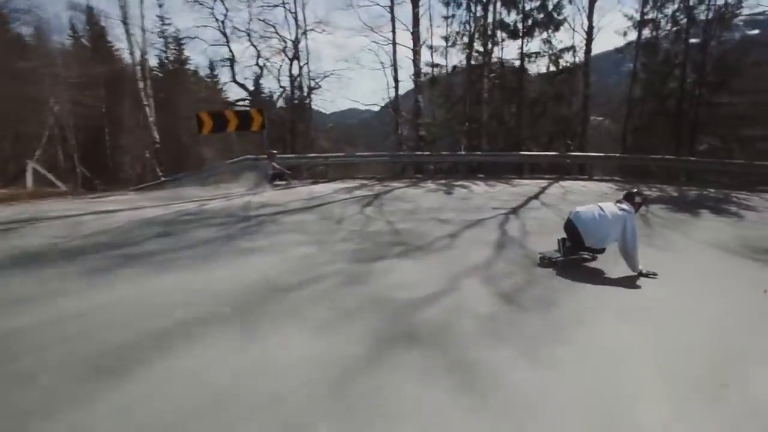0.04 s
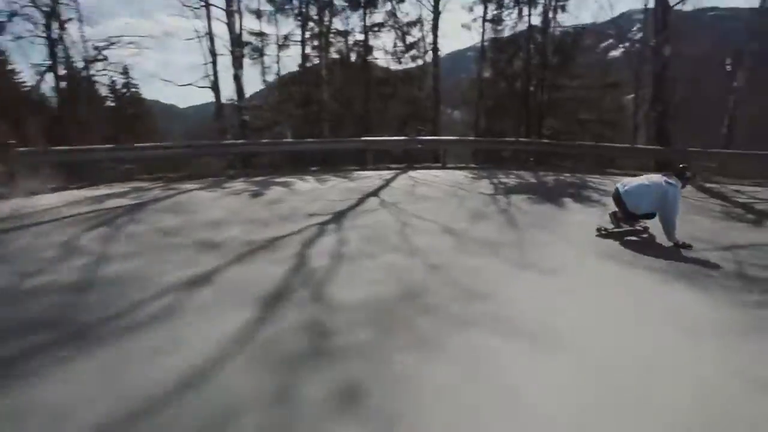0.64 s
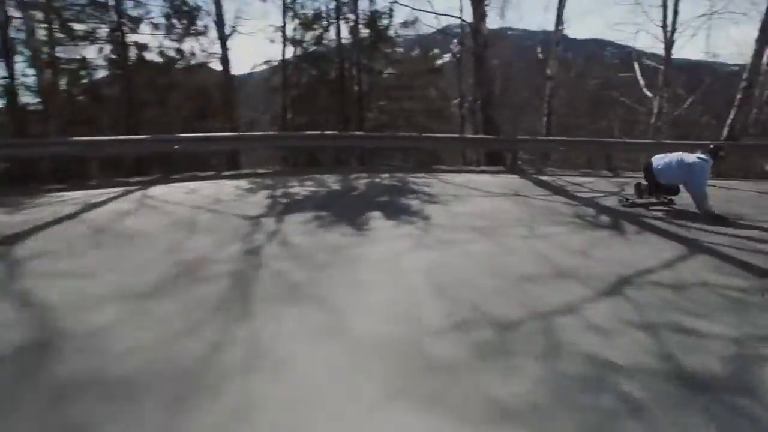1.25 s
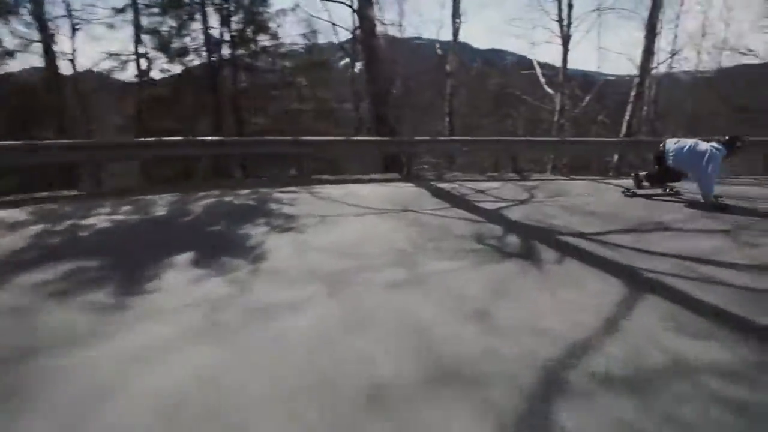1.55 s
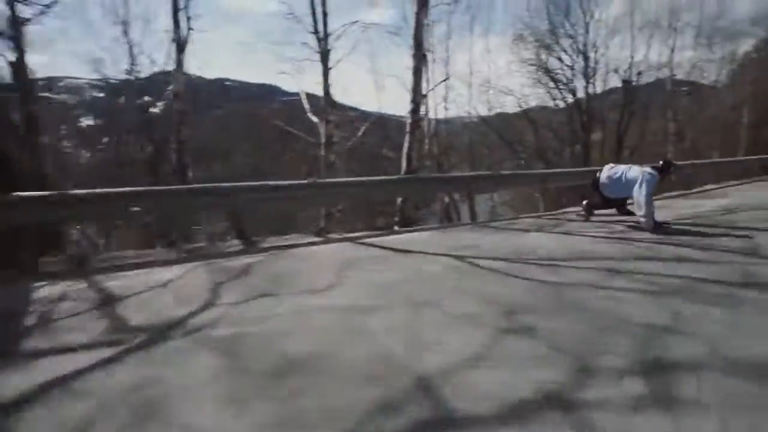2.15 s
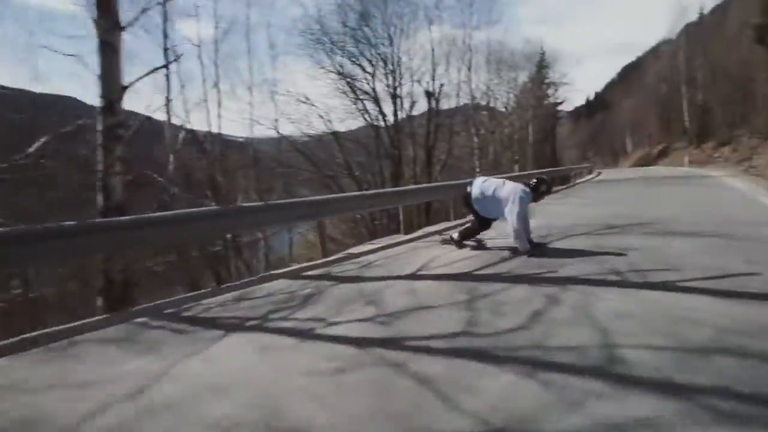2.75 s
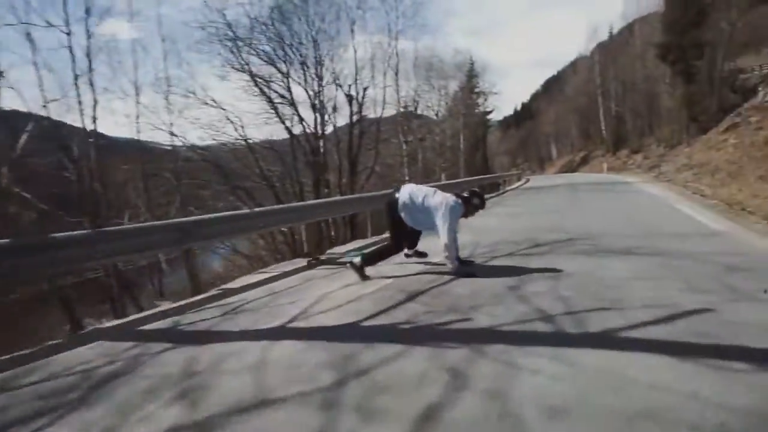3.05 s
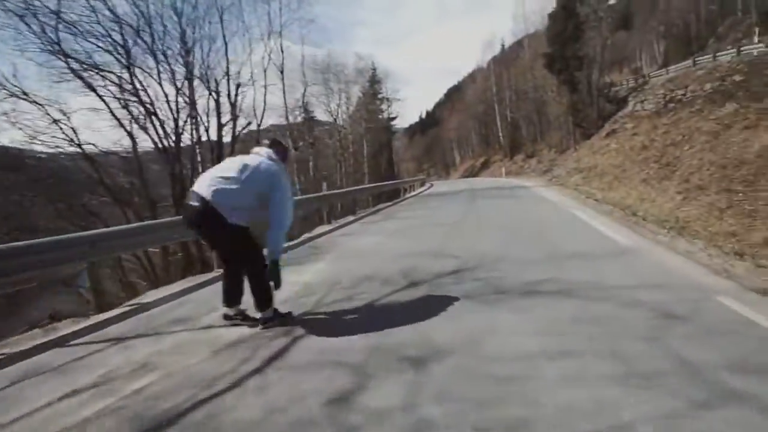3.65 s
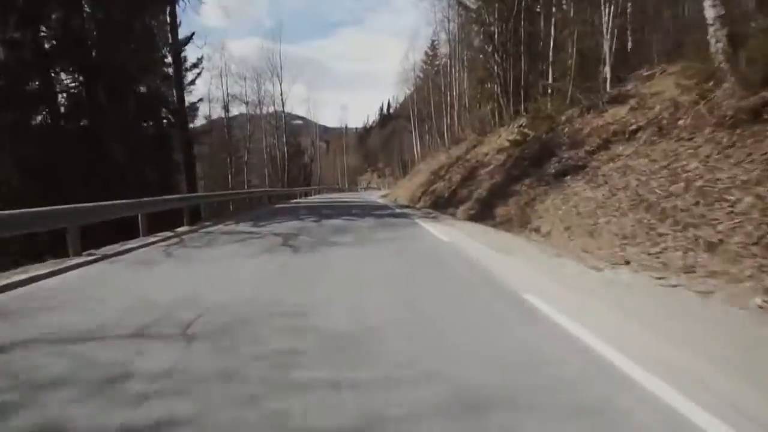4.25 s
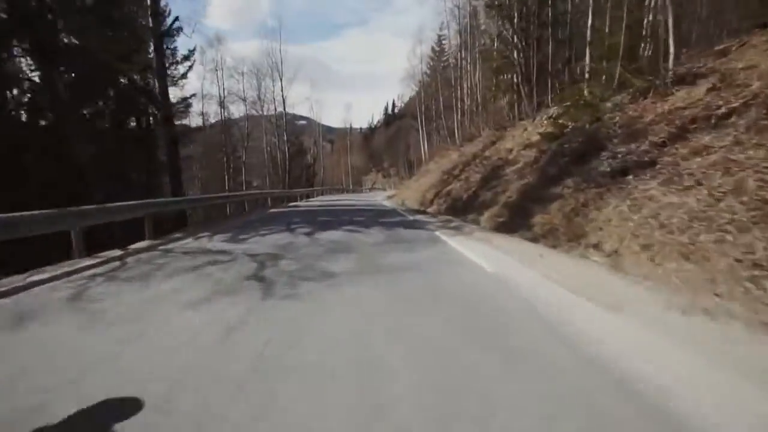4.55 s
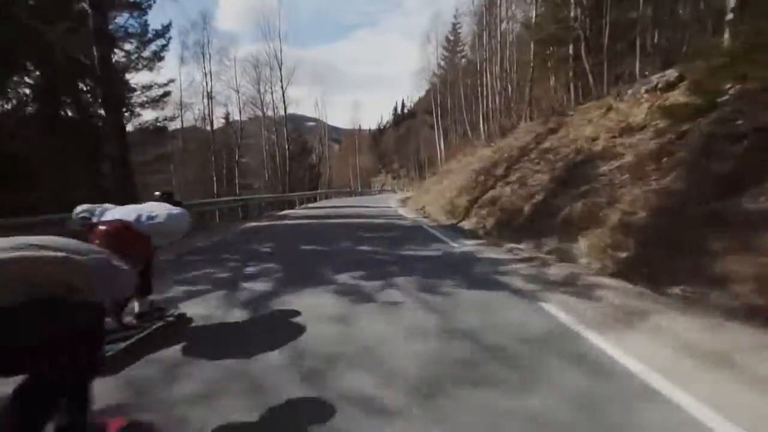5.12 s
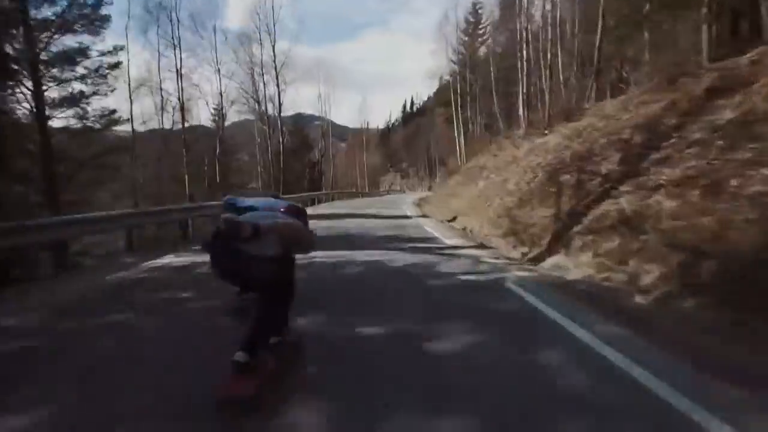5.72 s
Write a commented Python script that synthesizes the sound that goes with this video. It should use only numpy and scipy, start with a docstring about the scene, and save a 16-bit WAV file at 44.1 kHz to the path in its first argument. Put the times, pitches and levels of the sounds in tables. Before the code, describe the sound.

From the start, longboard wheels roll on asphalt with a quiet rumble and a fuzzy hum, while light, irregular gusts ruffle and thud on the microphone, mostly on the right. A faint gritty scrape and hiss of sliding wheels and a glove runs alongside, with small cracks of grit and short high chirps, strongest from about 1.3 to 2.8 seconds. Between roughly 0.7 and 2.5 seconds, the air on the right adds a soft, hollow rush. Around 3 seconds the scraping fades and the wheels settle into a faint whine, followed by a quick run of tiny metallic ticks at 3.6 to 3.8 seconds. At about 3.9 seconds, a click starts an abrupt, far louder wind roar on both sides. It covers the wheels, buffeting unevenly with a fizzy edge and growing slightly until the end, near 6 seconds.

```python
"""A mountain hairpin, heard from a car that follows longboarders. Rolling wheels hum, and sliding friction
makes a glove puck and the wheels scrape and chirp over gritty asphalt. Turbulent pressure from light
gusts ruffles mainly the right microphone port, and the cabin air resonates at an open window. As the
rider stands up, a chipped wheel ticks briefly; then, at an abrupt cut, a click and a loud wind roar
start in both ports."""
import sys
import numpy as np
from scipy import signal
from scipy.fft import rfft, irfft
from scipy.io import wavfile
from scipy.ndimage import uniform_filter1d, minimum_filter1d

SR = 44100
rng = np.random.default_rng(int(sys.argv[2]) if len(sys.argv) > 2 else 0)


def to_wav(s):
    """Save 16-bit WAV."""
    ch = np.atleast_2d(s).T  # columns
    pcm = np.round(np.clip(ch, -1, 1) * 32767)  # PCM
    wavfile.write(sys.argv[1], SR, pcm.astype(np.int16))


N = 254898
TIME = np.arange(N) / SR
BINS = np.fft.rfftfreq(N, 1 / SR)

# spectra of the wind noises: (frequency [Hz], relative spectral density [dB])
ROAR_SPECTRUM = [(24, -39), (42, -18.5), (90, -4.5), (200, -2), (400, 0), (620, 0), (950, -1.5), (1400, -9),
                 (2000, -24), (3000, -29.5), (6000, -64)]
FIZZ_SPECTRUM = [(700, -21), (1600, 10), (2600, -3), (4000, -7), (6000, -15.5), (9000, -24.5),
                 (12000, -31.5), (15500, -39)]
RUFFLE_SPECTRUM = [(25, -41), (70, -5.5), (130, -14), (300, 6.5), (500, 1.5), (800, -7), (1300, -18),
                   (2500, -33), (6000, -61)]
THUD_SPECTRUM = [(30, -35), (70, -1.5), (130, 1), (230, 5), (400, -6), (900, -44), (3000, -70)]
EDDY_SPECTRUM = [(25, -38), (55, -34), (110, -3), (170, -4), (240, 1.5), (400, -5), (650, -15), (1100, -38),
                 (2000, -55), (5000, -62)]
FAST_AIR_SPECTRUM = [(100, -49), (300, -1.5), (480, 1.5), (660, -2), (820, -3), (1050, -16), (1600, -24),
                     (4000, -46.5)]
# unequal response of the two ports to the airstream: (frequency [Hz], left minus right [dB])
PORT_BALANCE = [(30, 19), (60, 5), (120, -3.5), (220, -1.5), (500, 2), (740, 6), (1130, 10), (1700, 6.5),
                (2600, 3.5), (8000, 4), (15000, 6.5)]
# buffets of the whole airstream: (centre time [s], duration [s], left gain [dB], right gain [dB])
STREAM_BUFFETS = [(4.082, 0.058, -1.5, -5.5), (4.21, 0.023, 1.5, -5.5), (4.325, 0.062, 1, 2.5),
                  (4.43, 0.069, 3, 2), (4.578, 0.085, -2, 0), (4.68, 0.088, 1, 2.5),
                  (4.955, 0.077, -2.5, -4.5), (5.04, 0.064, -2, -4.5), (5.11, 0.074, 1, -1.5),
                  (5.19, 0.13, -.5, -2), (5.255, 0.02, 4, -3.5), (5.37, 0.057, 1, -2.5),
                  (5.565, 0.056, 0.5, 2.5)]
# surges in the roar's low band: (centre time [s], duration [s], left gain [dB], right gain [dB])
ROAR_SURGES = [(3.925, 0.051, 6.5, 2), (4.325, 0.11, 2, 1.5), (4.5, 0.04, 6, 0), (5.52, .035, 2, 0.5),
               (5.67, .07, 1.5, -1.5)]
# flares of fizz above the roar: (centre time [s], duration [s], left gain [dB], right gain [dB])
FIZZ_FLARES = [(4.053, 0.026, 8, -2), (4.16, 0.072, 3, -2), (4.685, 0.24, 2.5, 1), (4.95, 0.19, 3, 2),
               (5.1, 0.037, -0.5, 4), (5.42, 0.11, 2, -1)]
# single gusts: (time [s], relative level [dB], left minus right [dB], duration [s], thud share [0-1])
PORT_GUSTS = [(0.038, -47.5, 17, 0.031, 1), (0.328, -41.5, -14, 0.0049, 0.91),
              (0.364, -39, -29, 0.028, 0.027), (0.413, -48.5, -23, 0.033, 0),
              (0.513, -41, -30, 0.032, 0.57), (0.616, -42.5, -16, .016, 0.45),
              (0.67, -42.5, -10, 0.034, 0.66), (0.711, -41.5, -15, 0.016, 0.15),
              (0.74, -38, -7, 0.033, .45), (0.778, -44, 16.5, 0.019, 0.48), (1.034, -45, -24, 0.022, 0.55),
              (1.09, -37.5, -32, 0.017, 0.36), (1.467, -42, -20, 0.014, 0.16),
              (1.541, -39, -19, 0.024, 0.12), (1.586, -41.5, -24, 0.022, 0.36),
              (1.656, -41, -24, 0.012, 0.063), (1.767, -37, -24, 0.018, 0), (2.041, -42, -20, 0.012, 0.016),
              (2.141, -51.5, -18, 0.0076, .4), (2.422, -39.5, -16, 0.015, 0.029),
              (2.526, -41, -19, 0.026, 0.4), (2.607, -38, -19, 0.01, 0.74),
              (2.665, -43.5, -22, 0.016, 0.14), (2.841, -51, -22, 0.027, 0.25),
              (3.026, -43.5, -24, 0.023, 1), (3.127, -39.5, -32, 0.014, 0.76),
              (3.217, -42, -25, 0.016, 0.96), (3.336, -39.5, -26, 0.006, 0.91)]
# lulls as the side air lets go of the port: (centre time [s], duration [s], gain [dB])
BREEZE_LULLS = [(0.588, 0.035, -12), (0.858, 0.053, -9.5), (1.432, 0.042, -7.5), (1.729, 0.073, -14),
                (2.738, 0.17, -4.5), (2.973, 0.067, -4.5)]
# hollow note blown across the right port: (time [s], centre frequency [Hz])
HOLLOW_PITCH = [(1.0, 660), (1.12, 557), (1.27, 611), (1.38, 510), (1.55, 630), (2.05, 561.4), (2.22, 627),
                (2.45, 471)]

# spectra of rolling and sliding contact: (frequency [Hz], relative spectral density [dB])
RUMBLE_SPECTRUM = [(25, -9.5), (60, -3.5), (120, 0), (220, -2), (380, 2), (650, -1.5), (950, -6),
                   (1350, -9), (1800, -17), (2800, -21.5), (4000, -25), (8000, -30.5), (15000, -35)]
SCRAPE_SPECTRUM = [(500, -27), (1200, -3), (1900, 1), (2400, 1), (3000, -1), (3700, -5), (4700, -10.5),
                   (7000, -20)]
HISS_SPECTRUM = [(2500, -5), (4700, -2), (5900, 1.5), (6900, -6.5), (8000, 0.5), (8900, 3.5), (10200, -3),
                 (12500, -4.5), (15500, -10.5)]
# pitch of the wheels' hum, proportional to road speed: (time [s], frequency [Hz])
HUM_PITCH = [(0, 444), (.95, 455), (1.6, 468), (1.85, 505), (2.15, 515), (2.4, 495), (2.95, 490),
             (3.2, 466), (3.5, 457), (3.65, 446), (3.87, 443)]
# urethane under side load: (time [s], duration [s], centre frequency [Hz], fall [Hz], level [dB])
WHEEL_MOANS = [(.15, .13, 970, 140, -68.5), (3.48, .2, 763, 18, -70), (3.52, .18, 432, 30, -63),
               (3.69, .26, 326, 30, -60.5)]
# sliding: (time [s], relative scrape level [dB], relative hiss level [dB], scrape left minus right [dB])
SLIDE_LEVELS = [(0.02, -74, -67.5, 2), (0.09, -74.5, -71, 0), (0.89, -79, -80.5, -11), (1.22, -77, -77, -7),
                (1.33, -69.5, -76.5, -5), (1.75, -67, -72, -5), (1.8, -65, -74.5, -5),
                (2.38, -70.5, -75, -2), (2.46, -71, -69, -1), (2.66, -72, -73.5, 1)]
# rasps as the glove drags and lifts: (time [s], relative level [dB], duration [s])
GLOVE_RASPS = [(1.152, -64, .014), (1.83, -57.5, 0.018), (1.989, -56, 0.013), (2.106, -65, 0.0098),
               (2.445, -59, 0.013), (2.52, -65, .025), (2.726, -58, 0.018), (3.1, -68, 0.014),
               (3.198, -60.5, 0.026), (3.377, -68, 0.045), (3.462, -69.5, 0.032)]
# urethane gripping: (time [s], duration [s], start frequency [Hz], end frequency [Hz], level [dB])
SKID_CHIRPS = [(0.0, 0.049, 2600, 2730, -69), (0.14, 0.066, 2560, 2730, -71),
               (1.095, 0.027, 2850, 2870, -67), (1.984, 0.036, 2310, 2670, -64),
               (2.426, 0.057, 2520, 2890, -69), (2.731, 0.032, 2640, 2910, -63),
               (2.933, 0.028, 1850, 2000, -66), (2.986, 0.048, 2500, 3100, -67)]
# grit cracking under the slide: (time [s], relative level [dB], crunch gain [dB])
GRIT_CRACKS = [(0.0345, -62, -8), (.1765, -62, -1), (0.841, -63, -2), (1.026, -60, -4), (1.1775, -62, -1),
               (1.517, -60, 2), (1.6926, -62, -5), (1.9779, -70, 2), (1.992, -69, 11), (2.743, -73, 15),
               (2.995, -75, 13), (3.2147, -65, 8), (3.3937, -70, -1)]
# a chip in a wheel striking once a turn: (time [s], relative level [dB], main mode gain [dB])
CHIP_STRIKES = [(3.584, -71, -1), (3.638, -63.5, -1), (3.688, -64.5, 10), (3.7373, -61, -3),
                (3.7885, -67, 8), (3.8357, -72, 5)]
# lesser modes of wheel and truck: (frequency [Hz], relative level [dB], 60 dB decay time [s])
TRUCK_MODES = [(2630, -5, .028), (3250, -11, .02), (6450, -10, .012), (7900, -8, .014), (8450, -3, .006)]
# swells of the resonating cabin air: (time [s], duration [s], level [dB])
WINDOW_THROBS = [(.6, 0.5, -69), (1.545, 1.32, -66), (2.645, 1.2, -70)]

CRUISE_HZ = 480  # pitch of the hum at cruising speed


def airstream(cut_s=3.8743, growth_db_per_s=1.49, fizz_growth_db_per_s=2.5, body_hz=700):
    """Turbulent pressure grows with flow speed: roar and fizz, starting with a click at an abrupt cut."""
    age = np.maximum(TIME - cut_s, 0)
    ports = pan(read(PORT_BALANCE))
    eddies = wander(78)  # shared by roar and fizz
    roar = unit(turbulence(ROAR_SPECTRUM, eddy_hz=323, lumpy_db=2.6, sides=ports) * amp(1.46 * eddies))
    body = lowpass(roar, body_hz, slope=6)
    roar += (amp(at_ports(ROAR_SURGES)) - 1) * body
    fizz = unit(turbulence(FIZZ_SPECTRUM, eddy_hz=620, lumpy_db=2.5, sides=ports) * amp(1.55 * eddies))
    buffet_db = at_ports(STREAM_BUFFETS)
    lag_db = -2.5 * np.exp(-age / 0.3)  # the fizz takes a moment to build
    flare_db = at_ports(FIZZ_FLARES) + 0.22 * buffet_db + lag_db
    fizz *= amp(-18 + fizz_growth_db_per_s * age + flare_db)
    force = amp(-26 + growth_db_per_s * age + buffet_db) * pan(-0.25)
    wind = force * (amp(2.5) * roar + fizz)
    cut_ramp = np.interp(age, [0, 0.04], [0.75, 1])
    cut_click = -amp(-21.5) * np.exp(-age / 0.0007) * pan(18)
    return (TIME > cut_s) * (cut_ramp * wind + cut_click)


def gusts():
    """Passing vortices ruffle or thud on a port; the low pressure in each core gives a sharp suction."""
    ruffle, thud, core = np.zeros((3, 2, N))
    for s, db, side_db, length, thud_share in PORT_GUSTS:
        strength = amp(db) * pan(side_db)
        puff = strength * swell(s, length)
        ruffle += np.sqrt(1 - thud_share) * puff
        thud += np.sqrt(thud_share) * puff
        core += strength * bump(s + length / 4, length=0.0014)
    suction = -amp(-3) * irfft(rfft(core) * amp(read(RUFFLE_SPECTRUM)), N)
    ruffles = amp(-6) * ruffle * turbulence(RUFFLE_SPECTRUM, eddy_hz=160, lumpy_db=0.5)
    thuds = amp(-8) * thud * turbulence(THUD_SPECTRUM, eddy_hz=60, lumpy_db=-1.5)
    return ruffles + thuds + suction


def breeze(flutter_db=1.8):
    """Grazing flow brushes the right port with eddies; at the apex faster air blows a hollow note."""
    in_bend = hold(start=0.25, attack=0.14, end=3.14, release=0.45)
    at_apex = hold(start=0.63, attack=0.18, end=2.33, release=0.29)
    swept = hold(start=0.83, attack=0.12, end=2.26, release=0.16)
    eddy_gain = in_bend * amp(-53.5 - 7 * swept)  # the fast air sweeps the slow eddies away
    eddies = eddy_gain * turbulence(EDDY_SPECTRUM, eddy_hz=75.4, lumpy_db=4) * pan(-38)
    rush = amp(-56) * turbulence(FAST_AIR_SPECTRUM, eddy_hz=90, lumpy_db=1)
    hollow = amp(-59.5) * narrowband(follow(HOLLOW_PITCH)[0], width_hz=148)
    stream = at_apex * amp(flutter_db * wander(23)) * (rush + hollow) * pan(-19)
    lull_db = sum(db * bump(s, length) for s, length, db in BREEZE_LULLS)
    return (eddies + stream) * amp(lull_db)


def wheels(rumble_db_per_octave=6.5, hum_db_per_octave=45):
    """Rolling noise: rumble and hum grow with speed; as grip returns, the rumble dulls under a whine."""
    hz, = follow(HUM_PITCH)
    octaves = np.log2(hz / CRUISE_HZ)
    settled = np.interp(TIME, [2.9, 3.7], [0, 1])  # the board runs smoother out of the bend
    road_gain = amp(-60.5 + rumble_db_per_octave * octaves)
    road = road_gain * turbulence(RUMBLE_SPECTRUM, eddy_hz=39.4, lumpy_db=3)
    dull = lowpass(road, 1500, slope=8)
    rumble = (amp(-3.5 * settled) * dull + amp(-9 * settled) * (road - dull)) * pan(-0.52)
    hum = amp(-68.5 + hum_db_per_octave * octaves) * narrowband(hz, width_hz=17.5)
    drift = hold(start=1.2, attack=0.87, end=2.33, release=0.28)
    side_shudder = drift * amp(-61) * narrowband(hz, width_hz=57) * pan(1.5)
    grip = hold(start=2.7, attack=0.4, end=3.58, release=0.3)
    clear_tone = whine(hz, waver_hz=5) + amp(-4.5) * whine(2 * hz, waver_hz=5)
    return rumble + hum + side_shudder + amp(-65.5) * grip * clear_tone


def moans():
    """Urethane vibrates under side load in short falling tones."""
    out = np.zeros((2, N))
    for s, length, centre_hz, fall_hz, db in WHEEL_MOANS:
        progress, level = arch(s, length)
        out += amp(db) * level * whine(centre_hz + fall_hz * (0.5 - progress), waver_hz=5.2)
    return out


def slide(regrip_s=2.71, scrape_db_per_s=-16, hiss_db_per_s=-47):
    """Sliding friction breaks asperities under puck and wheels; the noise fades as the grip returns."""
    scrape_db, hiss_db, side_db = follow(SLIDE_LEVELS)
    easing_s = np.maximum(TIME - regrip_s, 0)
    contact = np.interp(TIME, [3.2, 3.58], [1, 0])  # the rider stands up
    patches = amp(1.04 * wander(45)[0])  # coarse and smooth road, heard in both ports
    rasp = sum(amp(db - 3.5) * swell(s, length) for s, db, length in GLOVE_RASPS)
    scrape_gain = contact * amp(scrape_db + 2 + scrape_db_per_s * easing_s) * patches
    hiss_gain = contact * amp(hiss_db + 1.5 + hiss_db_per_s * easing_s)
    scrape = turbulence(SCRAPE_SPECTRUM, eddy_hz=250, lumpy_db=3.5) * np.hypot(scrape_gain, rasp)
    hiss = turbulence(HISS_SPECTRUM, eddy_hz=500, lumpy_db=3) * np.hypot(hiss_gain, amp(-12) * rasp)
    return scrape * pan(side_db) + hiss * pan(-9.5)


def skids():
    """Stick-slip oscillation: the wheels chatter early in the drift and chirp upward as they bite."""
    scrape_db = follow(SLIDE_LEVELS)[0]
    early_drift = np.interp(TIME, [1.15, 1.4], [1, 0])
    chatter_hz = 2790 + 100.5 * wander(14)[0]
    out = early_drift * amp(scrape_db + 1.5 + 2 * wander(25)) * narrowband(chatter_hz, width_hz=330)
    slips = unit(amp(3.5 * np.tanh(wander(260))))
    for s, length, start_hz, end_hz, db in SKID_CHIRPS:
        progress, level = arch(s, length)
        chirp = narrowband(start_hz + (end_hz - start_hz) * progress, width_hz=200)
        out += amp(db) * level * slips * chirp
    return out * pan(-2.5)


def grit():
    """Brittle fracture of stones gives very short bursts: a bright snap and a coarser crunch."""
    snap = sum(amp(db + 1) * swell(s, length=0.0013) for s, db, _ in GRIT_CRACKS)
    crunch = sum(amp(db + crunch_db) * swell(s, length=0.0017) for s, db, crunch_db in GRIT_CRACKS)
    return (snap * colour(white(), HISS_SPECTRUM) + crunch * colour(white(), SCRAPE_SPECTRUM)) * pan(-2)


def wheel_ticks(ping_hz=5080, ping_t60_s=0.023):
    """Impacts of the chip excite damped modes of the truck; some catch its main ping squarely."""
    t = TIME[:SR // 10]
    modes = [(ping_hz, -1, ping_t60_s)] + TRUCK_MODES
    ping, *lesser = [amp(db - 60 * t / t60) * np.sin(2 * np.pi * hz * t) for hz, db, t60 in modes]
    ping *= 1 - np.exp(-t / 0.0008)
    rattle = 1 + np.tanh(wander(300)) / 2
    out = np.zeros((2, N))
    for s, db, ping_db in CHIP_STRIKES:
        at = round(s * SR)
        impact = amp(-17) * rng.standard_normal((2, len(t))) * np.exp(-t / 0.0022)
        impact[:, 0] += 1  # a click leads the tiny crunch
        ring = signal.fftconvolve(impact, sum(lesser)[None], axes=1)[:, :len(t)]
        ring += amp(ping_db) * ping * rattle[:, at:at + len(t)]
        out[:, at:at + len(t)] += amp(db - 3) * ring
    return out * pan(2.6)


def window_throb(cruise_throb_hz=43):
    """Cavity resonance of the cabin behind the open window: one deep tone that rises with speed."""
    hz = cruise_throb_hz * follow(HUM_PITCH)[0] / CRUISE_HZ
    level = sum(amp(db) * arch(s, length)[1] for s, length, db in WINDOW_THROBS)
    return level * unit(np.sin(2 * np.pi * np.cumsum(hz) / SR)) * pan(1.1)


def turbulence(spectrum, eddy_hz, lumpy_db, sides=1):
    """Bounded random amplitude modulation makes noise come in lumps, as of eddies or road grain."""
    lumps = amp(lumpy_db * 2 * np.tanh(wander(eddy_hz) / 2))
    return colour(white() * lumps, spectrum, sides)


def narrowband(hz, width_hz):
    """Random quadrature modulation spreads a pitch curve into a fuzzy tone."""
    phase = 2 * np.pi * np.cumsum(hz) / SR
    return unit(wander(width_hz) * np.cos(phase) + wander(width_hz) * np.sin(phase))


def whine(hz, waver_hz):
    """The road's grain modulates a tone in amplitude and frequency."""
    flutter = unit(amp(2.5 * np.tanh(wander(30))))
    return flutter * np.sin(2 * np.pi * np.cumsum(hz + waver_hz * wander(29), axis=1) / SR)


def white():
    """White noise, uncorrelated between the ports."""
    return rng.standard_normal((2, N))


def wander(rate_hz):
    """Band-limited random fluctuation for each port; rms 1."""
    return unit(irfft(rfft(white()) * np.exp(-(BINS / rate_hz) ** 2) * BINS / (BINS + rate_hz / 10), N))


def colour(x, spectrum, sides=1):
    """Spectral shaping of both channels; rms 1."""
    return unit(irfft(rfft(x) * amp(read(spectrum)) * sides, N))


def lowpass(x, corner_hz, slope):
    """Zero-phase low-pass; slope is in multiples of 6 dB per octave."""
    return irfft(rfft(x) / (1 + (BINS / corner_hz) ** slope), N)


def swell(s, length):
    """An envelope that rises quickly to 1 and decays exponentially."""
    u = np.clip((TIME - s) / (length / 2 + 1e-4), 0, 40)
    return u * np.exp(1 - u)


def arch(s, length):
    """Progress 0..1 through a note, and its half-sine envelope."""
    progress = np.clip((TIME - s) / length, 0, 1)
    return progress, np.sin(np.pi * progress)


def hold(start, attack, end, release):
    """A trapezoidal envelope that holds at 1 until end."""
    return np.clip((TIME - start) / attack, 0, 1) * np.clip(1 - (TIME - end) / release, 0, 1)


def bump(middle, length):
    """A Gaussian envelope of height 1."""
    return np.exp(-np.minimum((2 * (TIME - middle) / length) ** 2, 60))


def at_ports(rows):
    """Left and right gains in dB from a table of bumps."""
    return sum(np.array([[left], [right]]) * bump(s, length) for s, length, left, right in rows)


def read(points):
    """A spectrum table at every bin, interpolated in log frequency."""
    hz, value = np.transpose(points)
    return np.interp(np.log(BINS + 1), np.log(hz), value)


def follow(rows):
    """The columns of a time table, interpolated at every sample."""
    s, *columns = np.transpose(rows)
    return [np.interp(TIME, s, c) for c in columns]


def pan(side_db):
    """Constant-power gains; positive is to the left."""
    gains = amp(np.array([[0.5], [-0.5]]) * side_db)
    return gains / np.sqrt(np.mean(gains ** 2, 0))


def amp(db):
    """Decibels to amplitude ratio."""
    return 10 ** (np.asarray(db) / 20)


def unit(x):
    """Scales to rms 1."""
    return x / np.sqrt(np.mean(x ** 2) + 1e-20)


def scene():
    """Superposition of all sources at the two ports."""
    side_air = breeze() + gusts()
    board = wheels() + moans() + slide() + skids() + grit() + wheel_ticks()
    return side_air + board + window_throb() + airstream()


def record(dry, ceiling_db=-10, cutoff_hz=15700):
    """Fast peak limiting holds down the wind; a low-pass filter then limits the bandwidth."""
    needed = np.minimum(1, amp(ceiling_db) / (abs(dry) + 1e-9))
    gain = uniform_filter1d(minimum_filter1d(needed, size=301, axis=1), size=301, axis=1)
    band_limit = signal.firwin(511, cutoff_hz, window=("kaiser", 9), fs=SR)
    return signal.oaconvolve(dry * gain, band_limit[None], "same")


dry = scene()
out = record(dry)
to_wav(out)
```